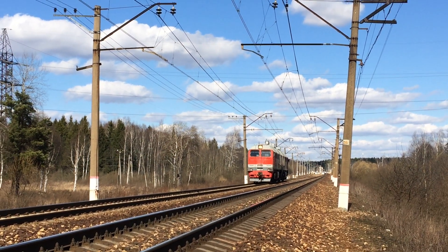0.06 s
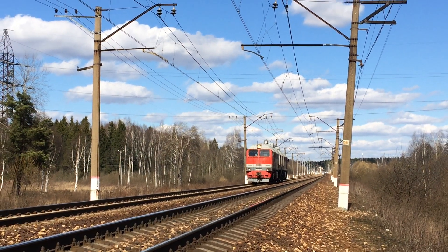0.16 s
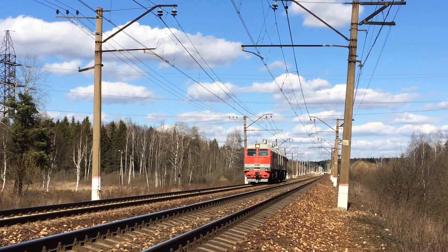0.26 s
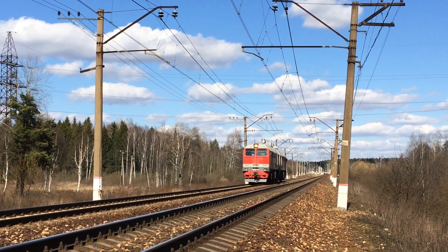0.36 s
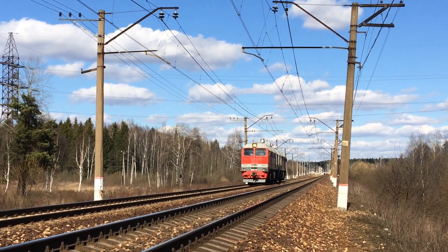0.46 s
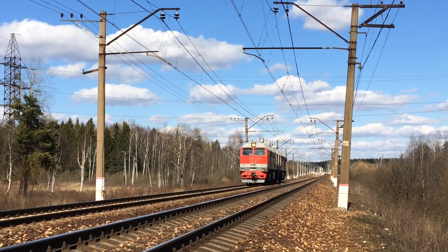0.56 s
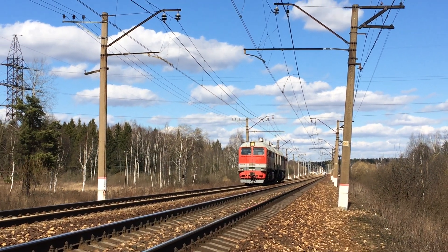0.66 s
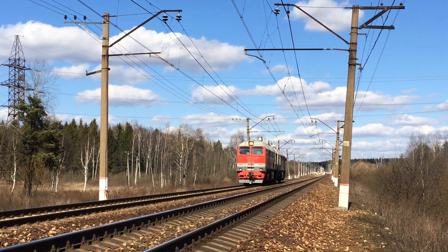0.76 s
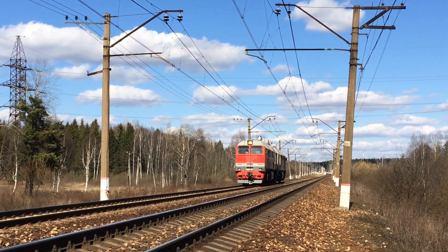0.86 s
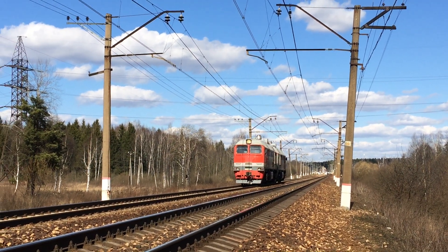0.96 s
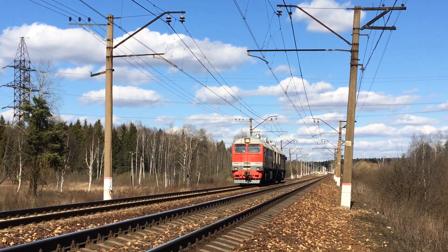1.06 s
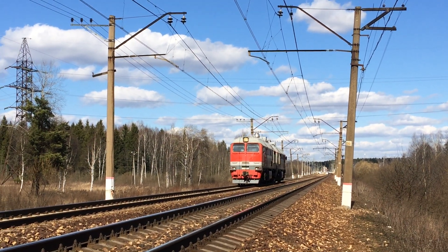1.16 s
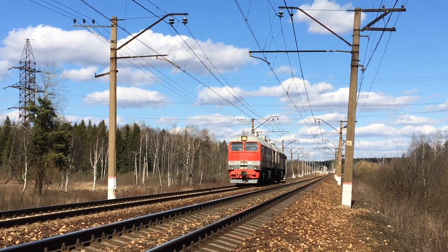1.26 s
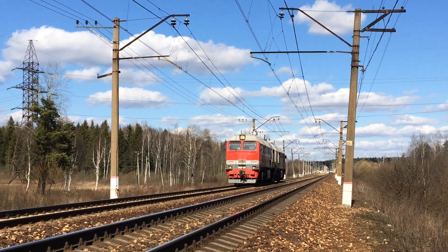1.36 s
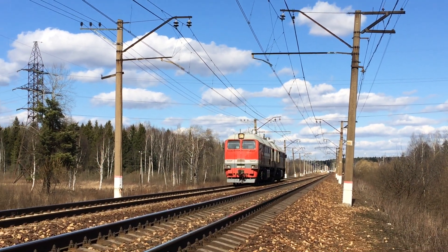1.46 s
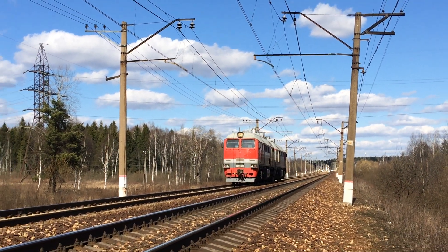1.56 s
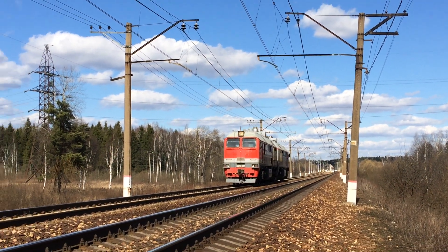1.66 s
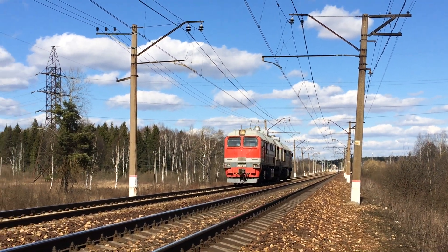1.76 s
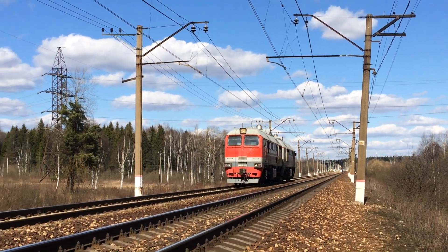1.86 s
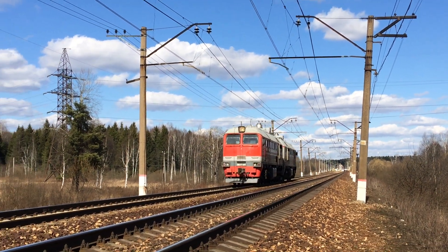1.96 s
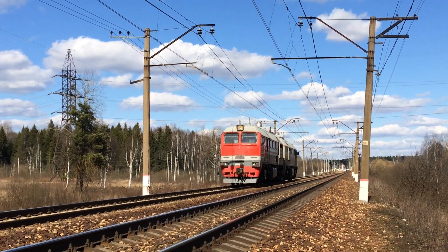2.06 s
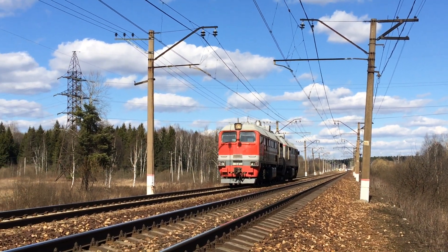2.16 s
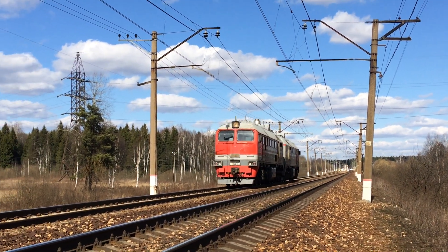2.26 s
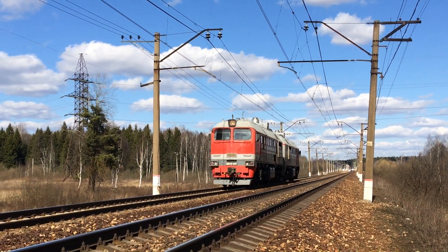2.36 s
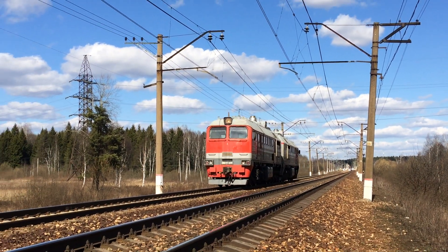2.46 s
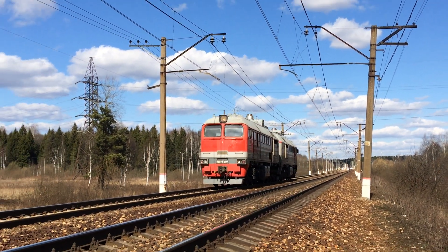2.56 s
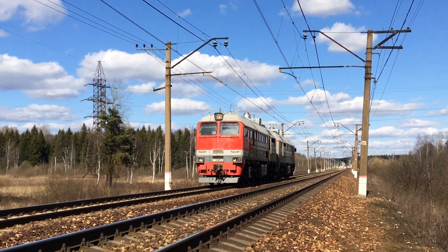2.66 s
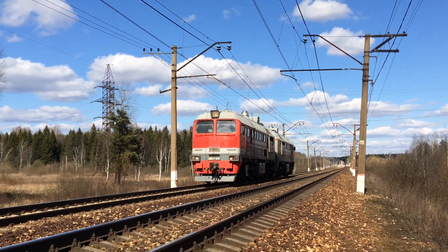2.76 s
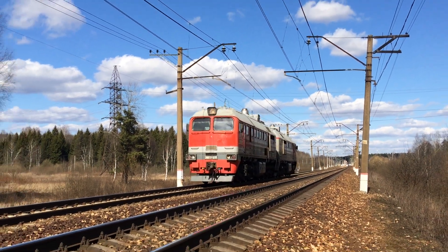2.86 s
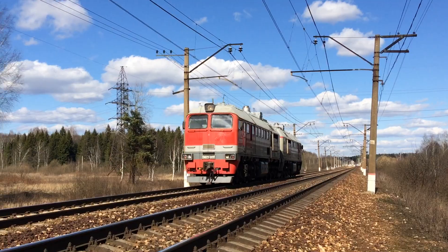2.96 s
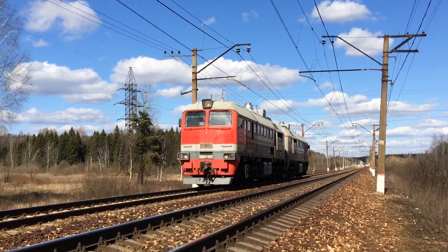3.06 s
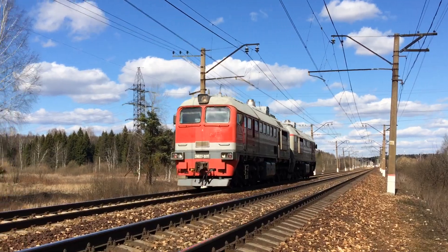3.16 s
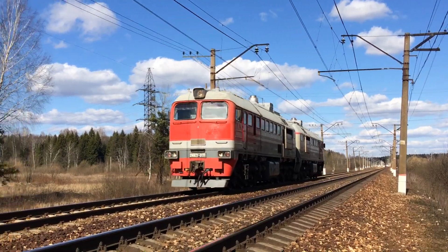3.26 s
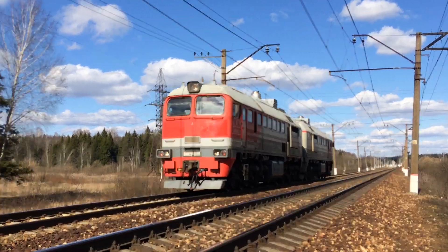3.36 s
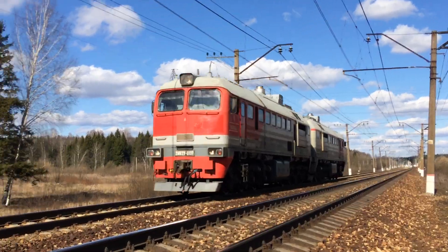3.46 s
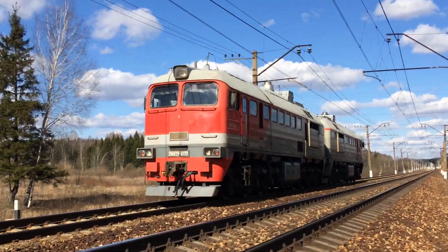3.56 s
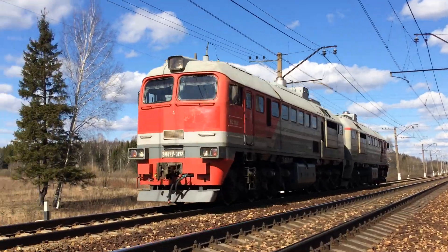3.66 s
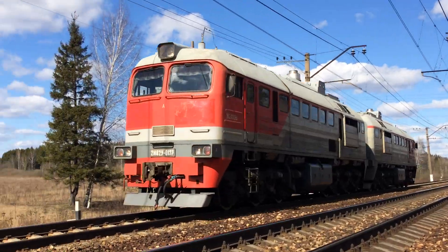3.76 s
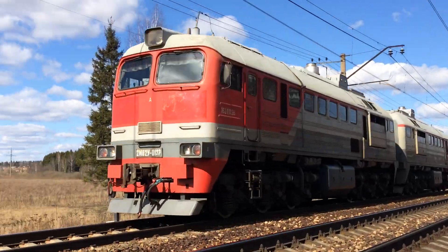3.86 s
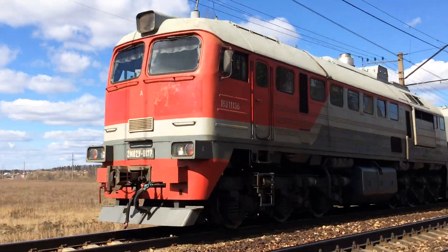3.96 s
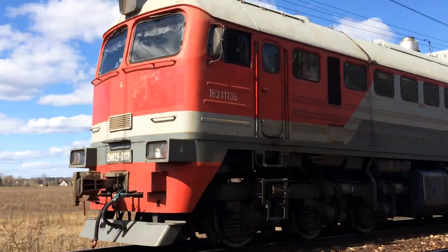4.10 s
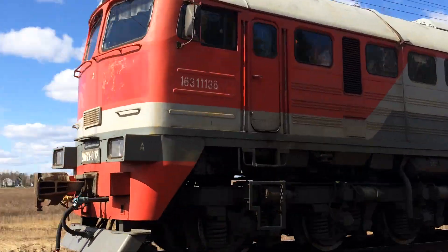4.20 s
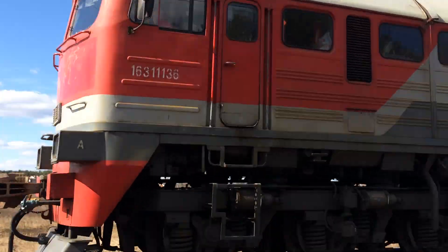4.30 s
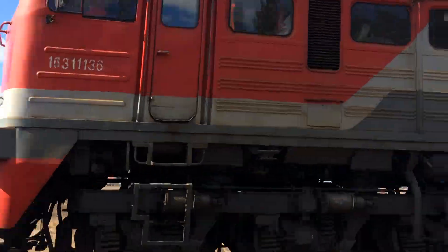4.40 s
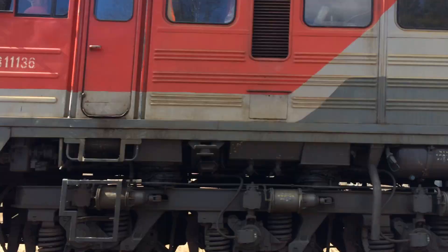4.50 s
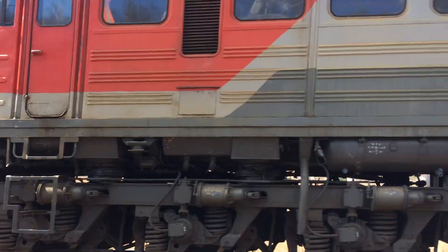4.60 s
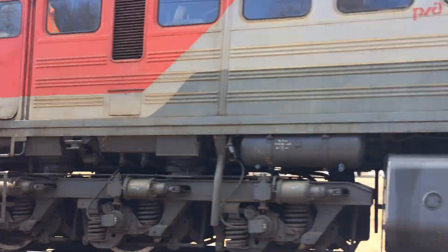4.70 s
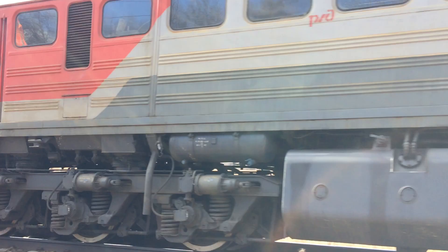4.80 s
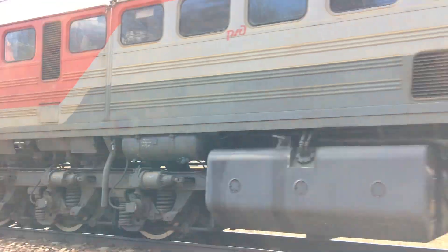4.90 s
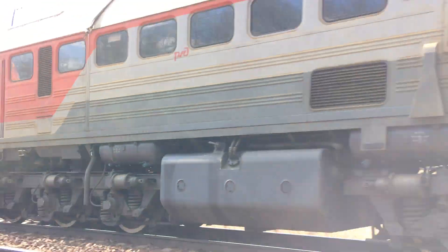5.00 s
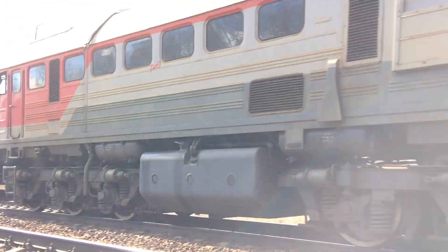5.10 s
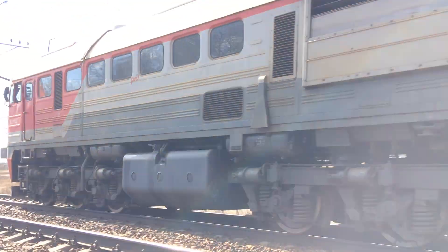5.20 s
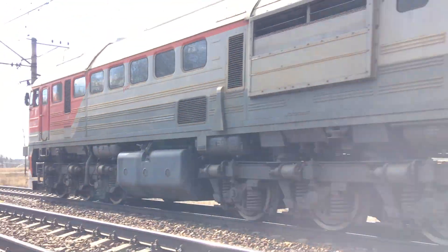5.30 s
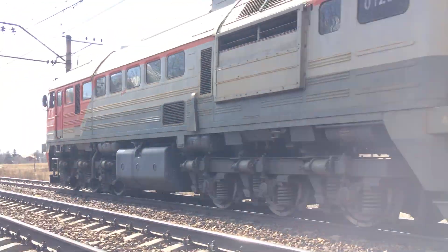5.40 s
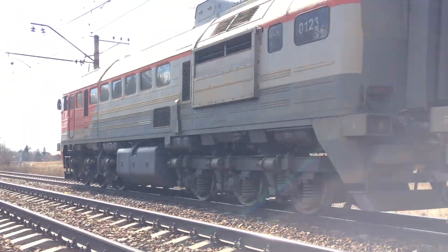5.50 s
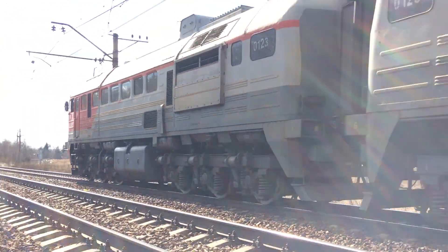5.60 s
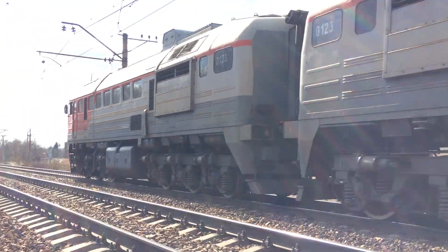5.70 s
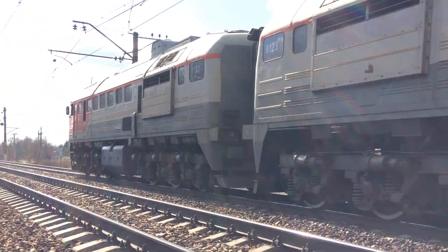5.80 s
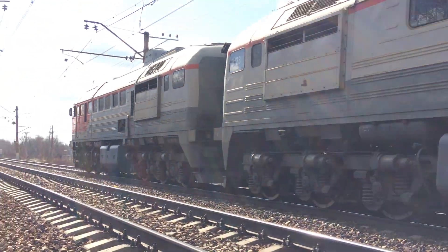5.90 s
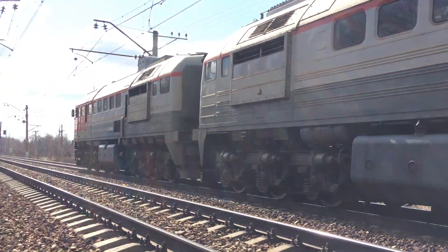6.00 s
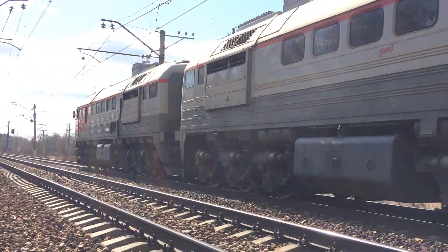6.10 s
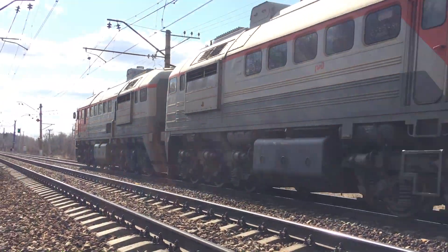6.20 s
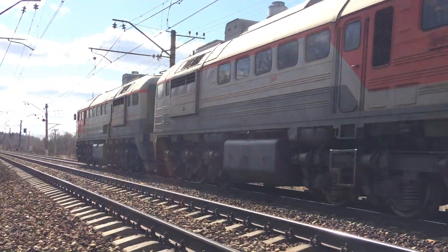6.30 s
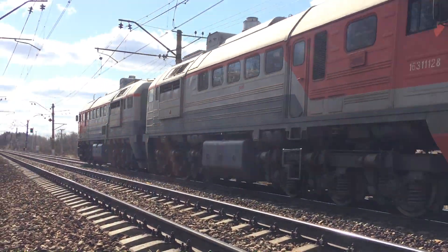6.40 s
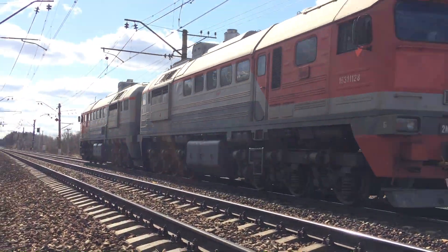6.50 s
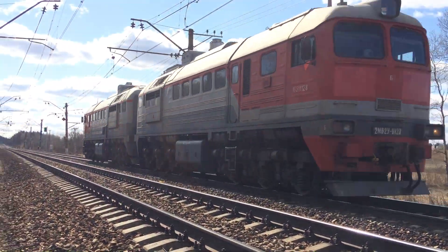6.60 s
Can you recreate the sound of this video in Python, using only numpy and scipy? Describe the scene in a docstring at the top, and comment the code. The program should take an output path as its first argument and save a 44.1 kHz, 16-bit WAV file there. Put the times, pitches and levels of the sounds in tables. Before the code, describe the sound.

A diesel locomotive approaches on an open line by a forest, heard from a few metres beside the track. At first there is only a quiet, uneven engine throb and faint rolling noise. At about 2.8 seconds its air whistle gives one short, shrill, breathy toot that sags slightly in pitch, with a thin echo from the trees. From 3 seconds the rails ring and hiss more strongly, and a worn wheel grinds and thumps about six times a second. From about 4.3 seconds the locomotive is alongside and loud: deep exhaust rumble, knocking engines, roaring wheels, heavy thuds and a rough fan note that sinks in pitch. Sharp metallic clanks strike between 3.8 and 5 seconds. The rear unit follows with a dull drone, and a valve spits air twice just after 6 seconds. The noise is only beginning to ease at the end, around 6.6 seconds.

```python
"""An open railway line at the edge of a forest: a two-unit diesel locomotive passes a few metres away.
The rails sing ahead of it, exhaust puffs throb in the stacks and the firings knock on the engine room
walls. Rough wheels roar on the steel, and a worn tread pounds the rail once a turn. On the way in, the
air whistle gives one short, overblown toot that the trees scatter back; a valve spits air as the rear
unit goes by."""
import sys
import numpy as np
from scipy import signal
from scipy.fft import rfft, irfft, next_fast_len
from scipy.io import wavfile
from scipy.ndimage import uniform_filter1d, map_coordinates

SR = 44100
rng = np.random.default_rng(int(sys.argv[2]) if len(sys.argv) > 2 else 0)


def unload_audio(sound):
    """Save the sound as a 16-bit wav file, at the path given as the first command line argument."""
    columns = np.transpose(np.atleast_2d(sound))
    # keep every value between -1 and 1, then stretch to whole-number steps
    steps = np.round(np.clip(columns, -1, 1) * 32767)
    wavfile.write(sys.argv[1], SR, steps.astype(np.int16))


N = 293265
TIME = np.arange(N) / SR
SPEED_M_PER_S, TRACK_DISTANCE_M = 17.0, 5.0
FRONT_S, REAR_S = 4.266, 6.3   # the first and the last bogie draw level
IN_VIEW_S, SWING_S = 4.403, 0.2   # the train's side is in view by then, after a swing this long
BLOW_FROM_S, BLOW_TO_S = 2.782, 2.982   # the whistle is at full pressure
FIRING_HZ = 80.85


def from_db(db):
    return 10 ** (np.asarray(db) / 20)


def rms_one(x):
    return x / np.sqrt(np.mean(x ** 2) + 1e-20)


def curve(rows):
    """Join (seconds, value) points with straight lines."""
    return np.interp(TIME, *np.transpose(rows))


def drift(per_s):
    """Random wander through this many points a second; rms 1."""
    knots = rng.standard_normal(4096)
    return rms_one(map_coordinates(knots, [TIME * per_s], order=1, mode="wrap"))


def noise(spectrum):
    """Noise shaped by (Hz, dB) points, falling steeply outside them; rms 1."""
    hz, db = np.transpose(spectrum)
    size = next_fast_len(N, True)
    octave, points = np.log2(np.arange(size // 2 + 1) * SR / size + 1), np.log2(hz)
    outside = np.abs(octave - np.clip(octave, points[0], points[-1]))
    gain = from_db(np.interp(octave, points, db) - 34 * outside)
    return rms_one(irfft(rfft(rng.standard_normal(size)) * gain, size)[:N])


def bandpass(x, low_hz, high_hz, order=2):
    return signal.sosfilt(signal.butter(order, [low_hz, high_hz], "band", fs=SR, output="sos"), x)


def resonate(x, modes):
    """Ring parallel resonances of alternating sign; rms 1."""
    out = 0
    for k, (hz, width_hz, db) in enumerate(modes):
        r = np.exp(-np.pi * width_hz / SR)
        poles = [1, -2 * r * np.cos(2 * np.pi * hz / SR), r * r]
        ring = (1 - r * r) * signal.lfilter([1, 0, -1], poles, x + 1e-18)
        out = out + (-1) ** k * from_db(db) * ring
    return rms_one(out)


def steady(x, seconds):
    """Even out the level over the given time."""
    return x / np.sqrt(np.abs(uniform_filter1d(x * x, int(seconds * SR))) + 1e-6)


def spike(at_s, rise_s, fall_s):
    """Exponential rise to a peak of 1 and exponential fall."""
    return np.exp(-np.minimum(np.maximum((at_s - TIME) / rise_s, (TIME - at_s) / fall_s), 40))


def surge(at_s, width_s):
    """A rounded rise and fall with a peak of 1."""
    return np.exp(-np.minimum(((TIME - at_s) / width_s) ** 2, 40))


def held(from_s, to_s, rise_db_per_s, fall_db_per_s):
    """Level in dB: attack, hold at 0 and release."""
    return -np.clip(np.maximum(rise_db_per_s * (from_s - TIME), fall_db_per_s * (TIME - to_s)), 0, 200)


def passing(from_s, to_s, loss_db):
    """Level in dB of a source that is alongside between two times; loss_db per doubling of distance."""
    along_m = SPEED_M_PER_S * (TIME - np.clip(TIME, from_s, to_s))
    return -loss_db * np.log2(np.hypot(along_m, TRACK_DISTANCE_M) / TRACK_DISTANCE_M)


def train_level(db, loss_db, ease_db_per_s, head_on_db=0):
    """Level in dB of a sound spread over both units: offset while head-on, easing towards the tail."""
    head_on = np.clip((IN_VIEW_S - TIME) / SWING_S, 0, 1)
    ease_db = ease_db_per_s * np.maximum(TIME - FRONT_S, 0)
    return db + passing(FRONT_S, REAR_S, loss_db) - ease_db + head_on_db * head_on


def firings(wander, uneven_db):
    """One click for each cylinder stroke, uneven in timing and strength."""
    strokes = np.cumsum(FIRING_HZ * (1 + wander * drift(60))) / SR
    return np.diff(np.floor(strokes), prepend=0) * from_db(uneven_db * rng.standard_normal(N))


def still_air():
    """A faint, very high hiss hangs over the fields."""
    return from_db(-74) * noise([(9500, -47), (11000, -6), (13000, 18), (15300, 4)])


# The ring of the rails and of the rear wheels. Each row: pitch in Hz, width in Hz, gain in dB.
RAIL_MODES = [(1800, 51, 15.5), (2310, 31, 10), (4660, 130, -8.5), (5220, 240, -5.5)]
REAR_WHEEL_MODES = [(687, 85, 6), (1626, 260, 2), (3640, 410, -11.5)]
# The rails' song builds ahead of the train. Each row: time in seconds, level in dB.
RAIL_SONG_LEVEL = [(0, -72), (2.0, -67), (2.7, -71), (3.2, -48), (3.8, -45.5), (4.35, -32), (4.8, -54),
                   (5.4, -53)]
def singing_steel():
    """The rolling contact keeps the rails and the rear unit's wheels ringing."""
    contact_band = [(650, 0), (5600, 0)]
    rails = from_db(curve(RAIL_SONG_LEVEL)) * resonate(noise(contact_band), RAIL_MODES)
    wheels_db = -31.5 + passing(from_s=5.5, to_s=6.1, loss_db=8)
    return rails + from_db(wheels_db) * resonate(noise(contact_band), REAR_WHEEL_MODES)


# The compressor's hollow hum. Each row: pitch in Hz, width in Hz, gain in dB.
COMPRESSOR_MODES = [(123, 33, 6), (155, 46, -3.5)]
def compressor():
    """The air compressor shakes the rear unit with a dull, pulsing drone."""
    drone = resonate(firings(wander=0.3, uneven_db=6), COMPRESSOR_MODES)
    level_db = -39 + passing(from_s=5.5, to_s=6.6, loss_db=7.5)
    return from_db(level_db) * rms_one(bandpass(drone, 100, 200))


# One cooling fan on each unit. Each row: passing time in seconds, pitch in Hz, level alongside in dB.
FANS = [(4.8, 407.4, -30), (6.0, 414, -33)]
def fan(at_s, centre_hz, db):
    """A rough, wavering blade note that sinks in pitch as it passes."""
    doppler_share = 0.095
    along_m = SPEED_M_PER_S * (TIME - at_s)
    hz = centre_hz * (1 - doppler_share * along_m / np.hypot(along_m, TRACK_DISTANCE_M))
    phase = 2 * np.pi * np.cumsum(hz * (1 + 0.04 * drift(70))) / SR
    level_db = db + passing(at_s - 0.4, at_s + 0.4, loss_db=9)
    return from_db(level_db + 3.8 * drift(45)) * np.sin(phase)


# The valve's bright hiss. Each row: frequency in Hz, relative level in dB.
VALVE_SPECTRUM = [(5000, -8), (7500, 2), (9300, -1), (10200, 7), (12500, 5), (15300, 7)]
# Its spits. Each row: time in seconds, peak level in dB.
SPITS = [(6.055, -31.5), (6.099, -30.5)]
def valve():
    """Compressed air escapes in two quick spits."""
    spits = sum(from_db(db) * spike(s, rise_s=0.0036, fall_s=0.036) for s, db in SPITS)
    return spits * noise(VALVE_SPECTRUM)


# Metallic accents. Each row: time in seconds, peak level in dB, ring in Hz.
CLANKS = [(1.483, -48, 1390), (3.84, -29, 1850), (4.41, -34.5, 5200), (4.495, -23, 1750),
          (4.656, -20, 1390), (4.927, -29, 3180), (5.007, -16.5, 1540), (5.043, -33.5, 3180)]
def clanks():
    """Sharp metallic clanks, several from the worn wheel striking the rail, each with its own pitch."""
    out = 0
    for s, db, hz in CLANKS:
        ring = steady(resonate(noise([(hz, 0)]), [(hz, 0.3 * hz, 0)]), seconds=0.0087)
        out = out + from_db(db) * spike(s + 0.00057, rise_s=0.0014, fall_s=0.021) * ring
    return out


# The deep voice of the stacks. Each row: pitch in Hz, width in Hz, gain in dB.
STACK_MODES = [(51.6, 3.6, 0.5), (71, 35, 10), (114, 60, -6.5), (141, 29, -32)]
# The weight of their lowest mode. Each row: time in seconds, level against the other modes in dB.
LOW_MODE_LEVEL = [(0, 4), (1.5, 20), (2.1, 2), (3.3, -5), (3.6, 10), (4.3, 12), (4.7, 2), (5.3, -4),
                  (5.9, 10), (6.65, 3)]
# The rumble swells as the train nears. Each row: time in seconds, level in dB.
EXHAUST_LEVEL = [(0, -46), (1.1, -45.5), (2.0, -47), (3.1, -47), (3.55, -36.5), (4.15, -36.5), (4.3, -32.5),
                 (4.85, -28.5), (5.45, -32), (5.9, -29), (6.65, -33)]
# Single booms on top. Each row: time in seconds, peak level in dB, half length in seconds.
BOOMS = [(0.24, -50, .08), (0.63, -40, 0.034), (0.967, -46, 0.076), (1.303, -38, 0.047),
         (1.415, -36, 0.025), (1.64, -40, 0.043), (2.6, -40, .02), (3.263, -30.5, 0.017),
         (3.383, -29, 0.017), (3.588, -30.5, 0.05), (3.88, -30, 0.073), (4.22, -30, 0.013),
         (4.33, -28, .03), (4.79, -28, 0.014), (4.997, -28, .02), (5.85, -27, 0.016), (6.037, -23.5, 0.011),
         (6.33, -26, 0.027)]
def exhaust():
    """Puffs from both engines boom in the stacks, throbbing at random."""
    puffs = firings(wander=0.25, uneven_db=5) + firings(wander=0.25, uneven_db=5)
    low_mode = from_db(curve(LOW_MODE_LEVEL)) * resonate(puffs, STACK_MODES[:1])
    rumble = bandpass(low_mode + resonate(puffs, STACK_MODES[1:]), 36, 220)
    throb = from_db(curve(EXHAUST_LEVEL) + 2 * drift(20))
    booms = sum(from_db(db) * surge(s, width_s) for s, db, width_s in BOOMS)
    return (throb + booms) * steady(rms_one(rumble), seconds=0.068)


# The boxy ring of the locomotive's body. Each row: pitch in Hz, width in Hz, gain in dB.
BODY_MODES = [(131, 33, -10), (200.2, 29, -2), (244, 29.4, 0.5), (303, 35, 0), (377.6, 67, -2),
              (437, 60, -2)]
def engine_knock():
    """Firings shake the engine room walls in uneven surges; head-on, the cab screens them."""
    knocks = firings(wander=0.2, uneven_db=-0.5) + firings(wander=0.2, uneven_db=4)
    walls = resonate(rms_one(knocks) + 0.82 * rng.standard_normal(N), BODY_MODES)
    walls = steady(rms_one(bandpass(walls, 140, 540, order=3)), seconds=0.092)
    level_db = train_level(-23.5, loss_db=8, ease_db_per_s=0.8, head_on_db=-4.5)
    return from_db(level_db + 1.22 * drift(22)) * walls


# Low, weighty accents. Each row: time in seconds, relative strength in dB.
HEAVY_THUDS = [(2.255, -27.5), (2.918, -29), (3.065, -34), (3.872, -10), (4.247, -12), (4.376, -8),
               (4.503, -10.5), (4.537, -14), (4.9, -14), (5.092, -7.5), (5.134, -8), (5.184, -7.5),
               (5.35, -7.5), (5.436, -11.5), (5.67, -5.5), (5.798, -9.5), (6.294, -11)]
def heavy_thuds():
    """Heavy thuds from the engines and the worn wheel make the locomotive's body ring."""
    thuds = sum(from_db(db) * spike(s + 0.0038, rise_s=0.0043, fall_s=0.011) for s, db in HEAVY_THUDS)
    body = bandpass(resonate(rng.standard_normal(N), BODY_MODES), 130, 520)
    return from_db(-8.5) * thuds * steady(rms_one(body), seconds=0.024)


# The colour of the wheels' roar and the rails' hiss when coming, alongside and leaving, and the
# sizzle on top. Each row: frequency in Hz, relative level in dB.
ROAR_COMING = [(76, -45), (130, -7.5), (161, -36), (241, -23), (279, -8), (370, 5), (434, 4), (632, 4.5),
               (815, -2.5), (945, 5.5), (1170, 0), (1730, -1), (2350, -17), (2620, -15), (3200, -11.5),
               (4160, -23), (7040, -120)]
ROAR_ALONGSIDE = [(88, -41), (150, -6), (226, 4.5), (328, -11.5), (397, -0.5), (561, -5.5), (697, -4),
                  (772, -23), (889, -0.5), (1210, -7.5), (1450, -10.5), (1750, -9), (2020, -27),
                  (2610, -22), (3200, -14.5), (4160, -52), (7040, -120)]
ROAR_LEAVING = [(120, -13), (200, -8), (400, -6.5), (540, -4), (610, -8), (700, -5.5), (790, -6),
                (870, -3.5), (1000, -9.5), (1200, -11), (1720, -10), (2000, -15), (2500, -35), (3200, -34)]
HISS_COMING = [(1900, -8), (2500, 1.5), (3300, -1.5), (4300, -1.5), (5200, -6), (5900, -9.5), (7600, -13.5),
               (9000, -20)]
HISS_ALONGSIDE = [(2000, -2), (2700, -2), (3450, 1), (4200, -0.5), (5500, -5.5), (7300, -8.5), (8400, -15),
                  (10000, -17.5)]
HISS_LEAVING = [(2100, -5.5), (2600, -3.5), (3100, -0.5), (3550, 0.5), (4200, -3.5), (5300, -9),
                (7300, -10.5), (8300, -18), (10000, -21.5)]
SIZZLE_SPECTRUM = [(7000, -26), (9000, -9), (10500, 3), (12000, 0), (15000, -2.5)]
# The ring of the wheels. Each row: pitch in Hz, width in Hz, gain in dB.
WHEEL_MODES = [(767, 326, 0.5), (992, 190, 1), (1340, 330, -5.5), (1740, 500, -3.5), (2282, 174, -3.5)]
# The swell of the hiss that the rails carry. Each row: time in seconds, level in dB.
HISS_LEVEL = [(0, -71), (1.4, -60.5), (2.65, -57), (3.2, -43), (3.93, -44), (4.3, -34), (5.3, -34.5),
              (6.0, -36.5), (6.28, -34.5), (6.65, -40.5)]
def rolling():
    """Rough treads shake wheels and rails; the colour changes as the bogies come, draw level and leave."""
    arrived, gone = np.clip((TIME - 3.5) / 0.81, 0, 1), np.clip((TIME - 5.15) / 0.5, 0, 1)
    coming, near, leaving = np.sqrt([1 - arrived, arrived * (1 - gone), gone])
    roar = coming * noise(ROAR_COMING) + near * noise(ROAR_ALONGSIDE) + leaving * noise(ROAR_LEAVING)
    roughness = rng.standard_normal(N) * from_db(2.65 * drift(200))
    wheels = bandpass(resonate(roughness, WHEEL_MODES), 500, 2600)
    hiss = coming * noise(HISS_COMING) + near * noise(HISS_ALONGSIDE) + leaving * noise(HISS_LEAVING)
    # Wheels radiate sideways, so they are weaker head-on.
    roar_db = train_level(-24.5, loss_db=5, ease_db_per_s=1.42, head_on_db=-8)
    ahead_m = SPEED_M_PER_S * np.maximum(FRONT_S - TIME, 0)
    air_loss_db = 0.16 * ahead_m   # the air swallows the sizzle on the way in
    sizzle_db = train_level(-54.5, loss_db=2.6, ease_db_per_s=2) - air_loss_db
    body = from_db(roar_db) * (from_db(-1) * roar + from_db(-5.5 - 4 * gone) * wheels)
    top = from_db(curve(HISS_LEVEL)) * hiss + from_db(sizzle_db) * noise(SIZZLE_SPECTRUM)
    judder = from_db(1.12 * drift(35))
    return judder * (body + top)


# The grind of the worn patch. Each row: frequency in Hz, relative level in dB.
GRIND_SPECTRUM = [(260, -41), (450, 4.5), (510, 0), (698, 3.5), (811, -3.5), (908, 2.5), (1260, -7.5),
                  (1440, -6), (1620, -7.5), (1790, -3), (2670, -12.5), (3520, -17.5), (4990, -18),
                  (9000, -33.5), (11700, -48), (19800, -120)]
def worn_tread():
    """Once a turn a rough patch grinds on the rail and thuds into the bogie, until the train hides it."""
    turn_s, alongside_s = 0.1625, (4.055, 4.6)
    contacts_s = 4.022 + turn_s * np.arange(-12, 7)
    grinds = sum(surge(s, width_s=0.039) for s in contacts_s)
    thuds = sum(surge(s + 0.024, width_s=0.035) for s in contacts_s)
    grind_db = -23.5 + passing(*alongside_s, loss_db=10.5)
    thud_db = -26.5 + passing(*alongside_s, loss_db=7.5)
    grit = from_db(1.6 * drift(250))
    tread = noise(GRIND_SPECTRUM) + from_db(-6) * resonate(rng.standard_normal(N), WHEEL_MODES)
    bogie = resonate(rng.standard_normal(N), BODY_MODES)
    return from_db(grind_db) * grinds * grit * tread + from_db(thud_db) * thuds * bogie


def leak():
    """A thin hiss of air runs just ahead of the toot."""
    level_db = -63 + held(from_s=2.59, to_s=2.8, rise_db_per_s=70, fall_db_per_s=150)
    return from_db(level_db) * noise(SIZZLE_SPECTRUM)


def forest_echo(toot, delay_s, doppler):
    """Trunks that the locomotive is leaving behind scatter the toot back: late, flat, thin and smeared."""
    source_s = BLOW_FROM_S + (TIME - BLOW_FROM_S - delay_s) * doppler
    lowered = map_coordinates(toot, [source_s * SR], order=3)
    lags_s = TIME[:SR // 4]
    trunks = rng.standard_normal(len(lags_s)) * np.exp(-lags_s / 0.046)
    smeared = signal.fftconvolve(lowered, trunks / np.linalg.norm(trunks))[:N]
    return bandpass(smeared, 2600, 3600)


# The toot sags a little. Each row: time in seconds, pitch in Hz.
WHISTLE_PITCH = [(2.75, 706), (2.795, 705), (2.83, 694), (2.87, 686), (2.93, 682), (2.98, 685), (3.1, 686)]
# Its bright edge. Each entry: relative level in dB, for harmonics 3 to 8.
OVERTONES = [-1, -6.5, -11, -2, -27, -28]
# The squeal and its combination tones, one whistle pitch apart, from four below it to two above.
# Each entry: relative level in dB.
SQUEAL_TONES = [-11, -15, -3, -7, -2, -7, -15]
# The breath in the toot. Each row: frequency in Hz, relative level in dB.
RUSH_SPECTRUM = [(500, -10), (750, 4), (1100, -13), (1450, 1.5), (1750, -6), (2150, 13), (2600, -13),
                 (3500, 7.5), (4700, 8), (5700, 5.5), (7000, -0.5), (9000, -4), (15000, -9.5)]
def whistle():
    """Air sounds a pipe; at full pressure a high mode squeals along and mixes with the fundamental."""
    squeal_hz, robbed_db = 4945, 8   # the squeal robs the overtones
    tone_db = -27.5 + held(BLOW_FROM_S, BLOW_TO_S, rise_db_per_s=650, fall_db_per_s=127)
    overtone_db = -28 + held(BLOW_FROM_S, BLOW_TO_S, rise_db_per_s=650, fall_db_per_s=147)
    rush_db = held(from_s=2.812, to_s=2.96, rise_db_per_s=540, fall_db_per_s=165)
    overblown = from_db(held(from_s=2.828, to_s=2.915, rise_db_per_s=550, fall_db_per_s=600))
    phase = 2 * np.pi * np.cumsum(curve(WHISTLE_PITCH) * (1 + 0.003 * drift(500))) / SR
    squeal_phase = 2 * np.pi * np.cumsum(squeal_hz * (1 + 0.0023 * drift(300))) / SR
    tone = np.sin(phase) + from_db(-13 + 2.2 * drift(70)) * np.sin(2 * phase)
    # At low pressure each higher harmonic loses a little more.
    dulling_db = 0.2 * np.minimum(rush_db + 6.5, 0)
    overtones = sum(from_db(db + k * dulling_db + 2 * drift(60)) * np.sin((k + 3) * phase)
                    for k, db in enumerate(OVERTONES))
    squeal = sum(from_db(db + 2 * drift(60)) * np.sin(squeal_phase + (k - 4) * phase)
                 for k, db in enumerate(SQUEAL_TONES))
    note = from_db(tone_db) * tone + from_db(overtone_db - robbed_db * overblown) * overtones
    pipe = note + from_db(-28) * overblown * squeal
    return np.sqrt(2) * pipe + from_db(-27.5 + rush_db) * noise(RUSH_SPECTRUM)


def scene():
    """Engines, running gear, whistle and valve, heard in mono from beside the track."""
    machinery = exhaust() + engine_knock() + heavy_thuds() + compressor() + sum(fan(*row) for row in FANS)
    running_gear = singing_steel() + rolling() + worn_tread() + clanks()
    toot = whistle()
    echo = from_db(-14) * forest_echo(toot, delay_s=0.075, doppler=0.86)
    return (machinery + running_gear + leak() + toot + echo + valve() + still_air())[None]


def record(dry):
    """The top is cut steeply; the ends are eased over a few milliseconds."""
    cutoff_hz, fade_s = 15400, 0.004
    fade = np.clip(np.minimum(TIME, TIME[-1] - TIME) / fade_s, 0, 1)
    return signal.sosfilt(signal.ellip(12, 0.2, 80, cutoff_hz, fs=SR, output="sos"), dry * fade)


dry = scene()
out = record(dry)
unload_audio(out)
```